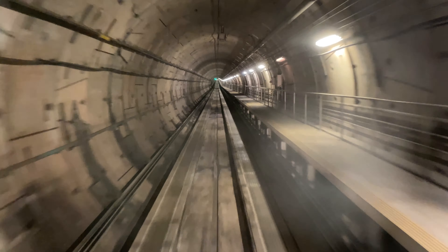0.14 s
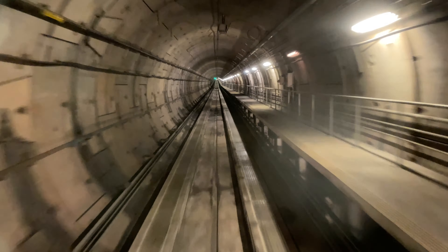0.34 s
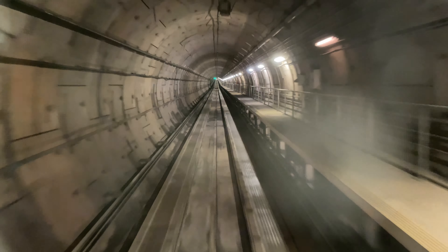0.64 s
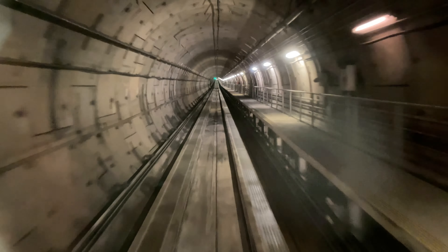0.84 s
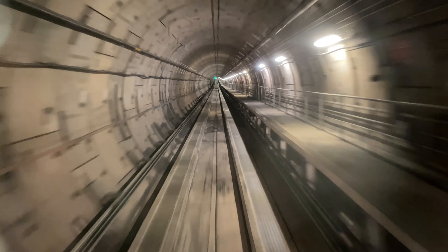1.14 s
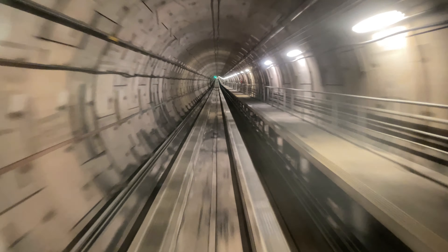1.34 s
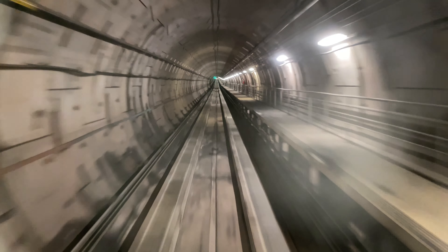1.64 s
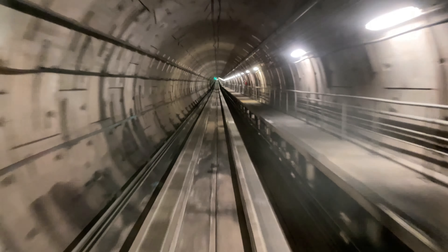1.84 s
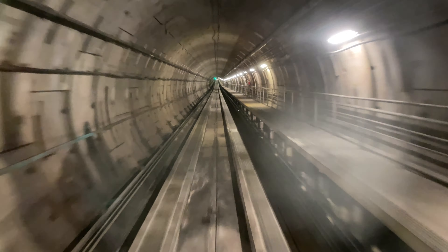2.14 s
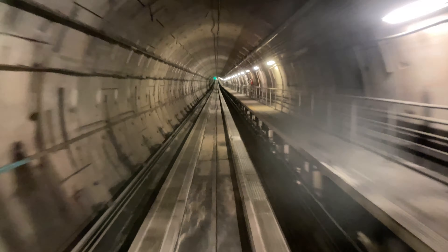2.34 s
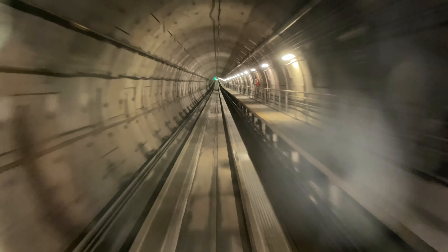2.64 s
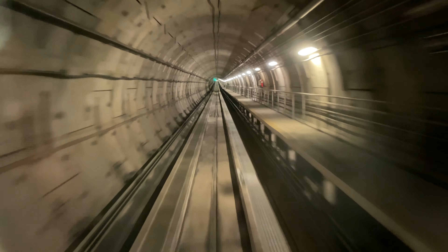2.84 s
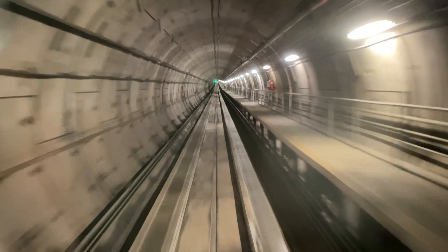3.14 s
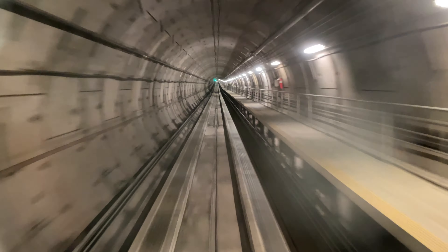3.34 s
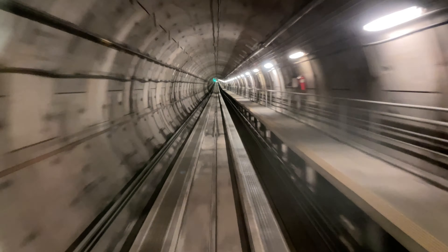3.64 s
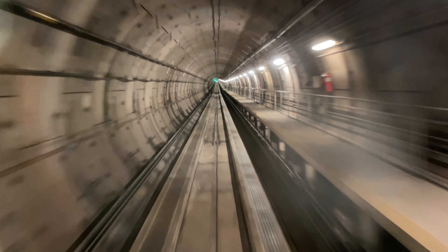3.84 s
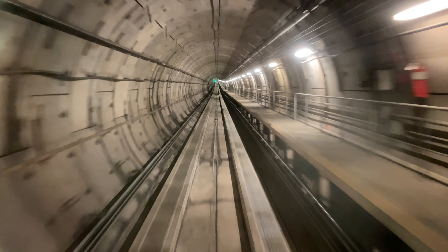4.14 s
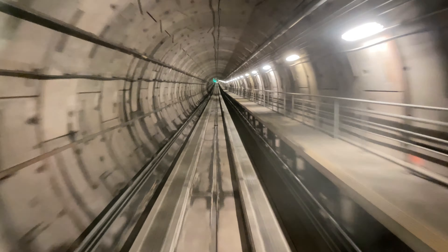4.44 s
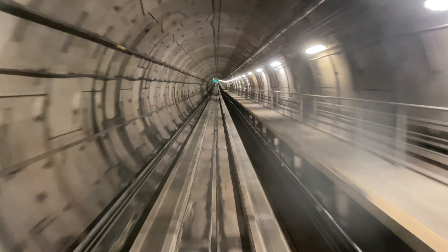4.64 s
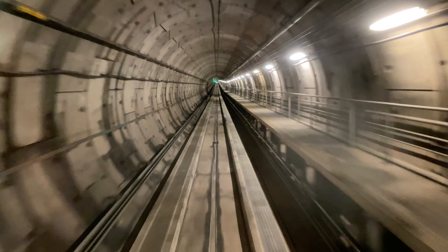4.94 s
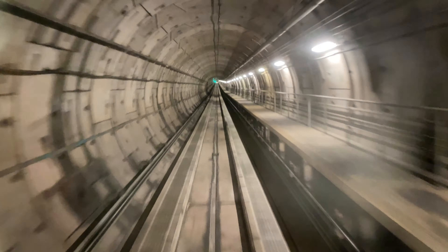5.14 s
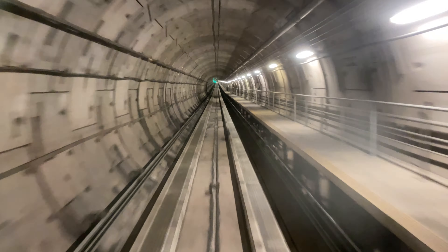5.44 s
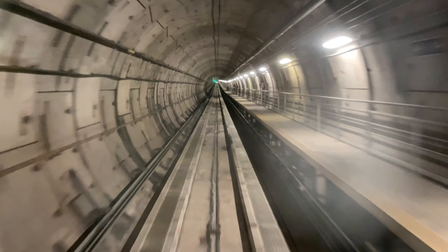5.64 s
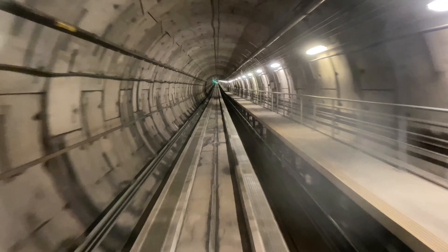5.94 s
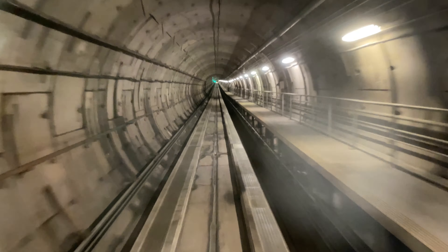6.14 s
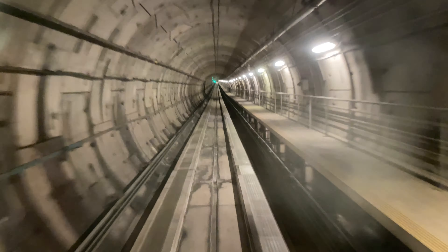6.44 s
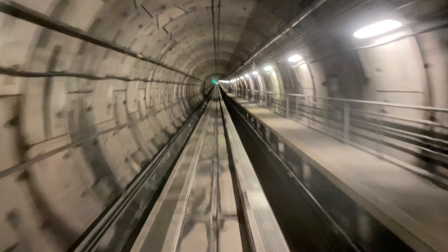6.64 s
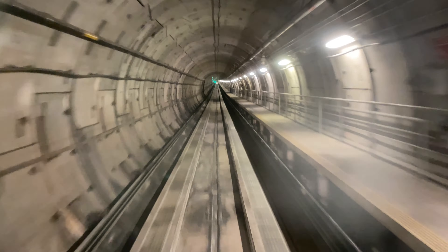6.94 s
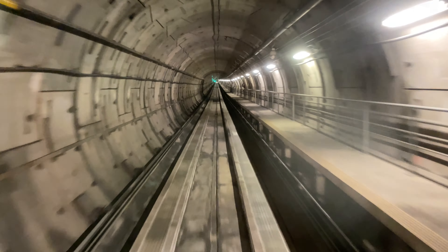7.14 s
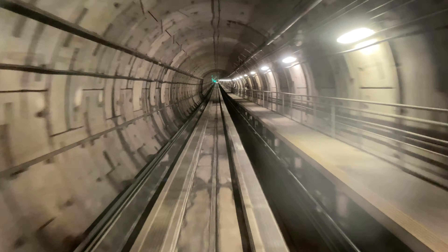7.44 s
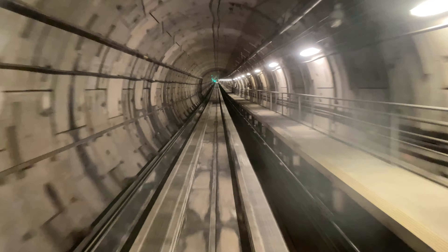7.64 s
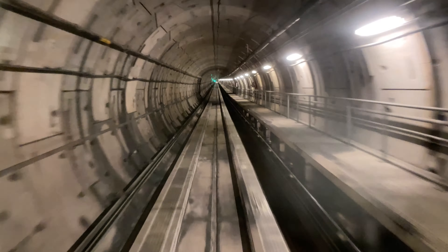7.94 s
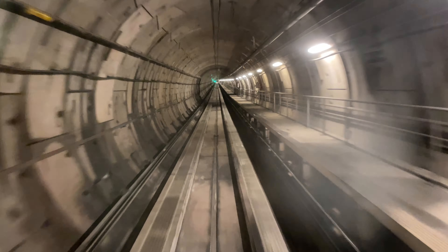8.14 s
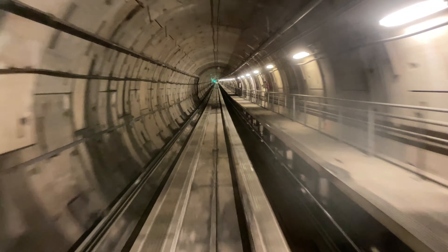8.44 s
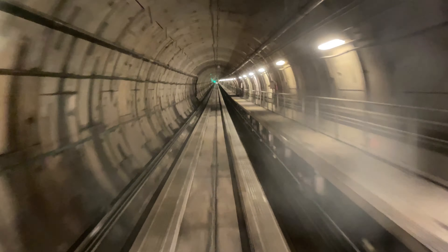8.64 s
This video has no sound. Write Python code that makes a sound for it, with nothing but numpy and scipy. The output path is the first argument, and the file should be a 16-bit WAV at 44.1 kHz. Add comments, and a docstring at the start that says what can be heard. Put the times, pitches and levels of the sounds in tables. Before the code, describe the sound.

A train on rubber tyres picks up speed in a tunnel, heard by a phone inside the car. Humming tyre tones climb gently and settle at cruising pitch, swelling and fading over a continuous heavy rumble and rolling hiss. A second, slightly lower set of tones and a faint electric whine die away by the middle. A fan hum and a low booming drone continue underneath as the ride grows slightly quieter.

```python
"""A deep rumble and a stack of slowly rising tyre tones: the front car of a rubber-tyred train gathering
speed in a concrete tunnel, heard by a phone. Tread blocks meeting the track sing the tones, with a roar
around them, and a slower set of tyres dies away. Underneath, a shaft booms and a fan hums; on top,
rolling noise hisses through the walls and the drive electronics whistle faintly."""
import sys
import numpy as np
from scipy import signal
from scipy.fft import rfft, irfft, next_fast_len
from scipy.io import wavfile
from scipy.ndimage import uniform_filter1d, minimum_filter1d

SR = 44100
rng = np.random.default_rng(int(sys.argv[2]) if len(sys.argv) > 2 else 0)


def store_wav(level_fs):
    """Save 16-bit WAV to argv[1]."""
    pcm = np.round(np.clip(np.atleast_2d(level_fs), -1, 1) * 32767)
    wavfile.write(sys.argv[1], SR, pcm.T.astype(np.int16))


N = 387638

# Colours of the cabin rumble, the rolling hiss and its treble: f/Hz, relative level/dB
RUMBLE_COLOUR = [(22, -37.5), (32, -12.5), (45, 1), (65, -2.5), (100, -4.5), (125, -10), (150, -12),
                 (230, -13), (380, -19.5), (700, -29), (1000, -78), (2000, -120)]
HISS_COLOUR = [(500, -24), (900, 0.5), (1200, -1.5), (1500, -8.5), (2050, -6.5), (2600, -16), (3300, -21.5),
               (4000, -25.5), (5200, -32), (5600, -34.5), (7200, -34.5), (9000, -39), (10500, -36.5),
               (13400, -45), (14400, -50.5)]
TREBLE_COLOUR = [(1800, -30.5), (2500, 0), (3500, -5), (5000, -14.5), (7000, -20), (8500, -49)]
# Fader rides of those three beds along the tunnel: t/s, level/dB
RUMBLE_RIDE = [(0, -24), (.7, -20), (1.3, -21), (1.9, -21), (2.3, -21.5), (2.9, -22), (3.8, -24.5),
               (4.6, -23.5), (5.3, -24.5), (5.9, -25.5), (6.5, -23.5), (7.2, -24), (7.8, -24.5), (8.3, -24),
               (8.79, -26.5)]
HISS_RIDE = [(0, -31.5), (.6, -32), (1.15, -32.5), (1.5, -32), (1.9, -33.5), (2.4, -33.5), (3.2, -34.5),
             (4.6, -35), (5.7, -36.5), (7, -36), (8.79, -37)]
TREBLE_RIDE = [(0, -59), (.5, -52), (1.0, -64.5), (1.35, -59), (1.5, -49.5), (1.75, -59), (2.3, -59),
               (3.0, -62), (3.3, -54), (4.0, -60), (4.45, -59), (5.0, -62), (8.79, -69)]
# Narrow whistling bands: f/Hz, width/Hz, level/dB, flicker/dB
WHISTLE_BANDS = [(3330, 200, -60, 1.5), (5150, 400, -72, 2.5), (11450, 450, -68, .5), (13360, 90, -82, 3),
                 (11435, 40, -72, .5), (11540, 60, -76, .5)]
# Fader rides of the drive whine, the fan and the shaft: t/s, level/dB
WHINE_RIDE = [(0, -76), (.7, -69), (1.05, -68), (1.22, -64), (1.5, -67), (2.1, -71), (2.6, -74), (3.2, -80),
              (8.79, -88)]
FAN_RIDE = [(0, -26.5), (.5, -26.5), (1.2, -30), (1.55, -25.5), (2.0, -30.5), (2.35, -35.5), (2.8, -30),
            (4.0, -34), (5.0, -34.5), (5.6, -34.5), (6.2, -44), (6.8, -37), (7.2, -44), (8.2, -41),
            (8.5, -30.5), (8.79, -38)]
SHAFT_RIDE = [(0, -37), (.6, -28), (1.4, -31), (1.75, -19.5), (2.0, -26), (2.7, -20.5), (3.3, -23),
              (3.45, -26), (3.7, -22.5), (4.15, -28.5), (4.32, -18), (4.5, -29), (4.7, -20.5), (4.9, -23.5),
              (5.15, -19.5), (5.55, -25.5), (5.95, -28.5), (6.2, -20.5), (6.7, -20.5), (7.1, -29.5),
              (8.0, -30), (8.4, -40.5), (8.65, -26.5)]
# Humps of the tyre roar: multiple of the tread rate, relative level/dB
ROAR_COLOUR = [(.8, -42), (.95, -16.5), (1.08, -18), (1.3, -31), (1.72, -19), (1.83, -6.5), (1.92, -4.5),
               (2.0, -1), (2.1, -3), (2.2, -4.5), (2.4, -10), (2.62, -14.5), (2.78, -7), (3.0, -2.5),
               (3.2, -5), (3.45, -15), (3.7, -15), (4.0, -7.5), (4.3, -16.5), (4.6, -26.5), (5.0, -15.5),
               (5.5, -26.5), (6.0, -24), (6.6, -31), (8, -41.5), (14, -120)]
# The slower tyres dying away: t/s, 1st partial level/dB, 2nd partial level/dB
SLOW_TYRE_RIDE = [(0, -40, -29), (.25, -26, -16.5), (.45, -32.5, -21.5), (.6, -36, -23.5),
                  (.72, -30, -21.5), (.92, -32, -18.5), (1.05, -36.5, -26), (1.3, -39, -33.5),
                  (1.8, -31, -28), (2.2, -27.5, -34), (2.6, -27, -23.5), (3.0, -28, -33), (3.7, -42, -40.5),
                  (4.4, -36.5, -34), (5.2, -58.5, -52.5)]
# Swells and fades of the three tread partials: t/s, level/dB
TREAD_RIDE_1 = [(0, -21.5), (.4, -31.5), (.75, -29.5), (1.3, -33), (2.3, -25.5), (2.9, -31), (4.0, -37),
                (4.55, -29), (5.1, -24.5), (5.4, -29), (5.55, -48), (5.9, -36), (6.4, -37), (6.8, -34),
                (7.1, -38), (7.55, -42.5), (7.75, -30), (7.85, -40.5), (8.0, -33.5), (8.25, -36.5),
                (8.4, -31.5), (8.79, -34)]
TREAD_RIDE_2 = [(.15, -37.5), (.4, -19), (.6, -42), (.95, -27.5), (1.2, -48), (1.4, -22), (1.6, -30.5),
                (1.8, -19.5), (2.0, -27), (2.17, -20), (2.27, -24), (2.36, -16), (2.55, -25.5),
                (2.75, -18.5), (2.92, -24), (3.02, -16), (3.3, -25), (3.45, -20), (3.65, -20.5),
                (3.75, -27.5), (3.84, -18.5), (4.0, -31), (4.2, -21), (4.5, -28), (4.75, -18), (5.0, -13.5),
                (5.12, -19.5), (5.22, -21.5), (5.4, -16), (5.65, -19), (5.9, -24), (6.1, -23.5),
                (6.25, -20.5), (6.55, -20), (6.85, -22), (7.05, -31), (7.25, -29.5), (7.35, -21),
                (7.7, -19), (7.9, -22.5), (8.02, -30), (8.1, -17.5), (8.35, -23), (8.52, -18),
                (8.62, -27.5), (8.79, -31)]
TREAD_RIDE_3 = [(0, -33.5), (.3, -31), (.9, -39), (1.05, -26.5), (1.15, -30.5), (1.27, -20), (1.4, -38.5),
                (1.58, -15.5), (1.68, -31.5), (1.76, -21.5), (1.88, -39), (2.0, -25.5), (2.6, -25.5),
                (2.85, -32.5), (3.5, -30), (3.8, -26.5), (4.0, -35), (4.25, -21), (4.6, -29.5), (5.1, -31),
                (5.6, -23.5), (6.1, -30), (6.8, -33.5), (7.2, -36.5), (7.7, -38.5), (8.0, -28.5),
                (8.2, -38.5), (8.5, -24), (8.79, -37)]
# The cabin at the two microphone ports: f/Hz, likeness 0-1, left lead/rad, left minus right/dB
STEREO_IMAGE = [(40, .999, 0, -0.5), (130, 0.97, 0, -0.5), (200, 0.87, 0, -3.5), (332, 0.86, 0.5, 0),
                (428, 0.2, 0.46, 0.5), (433, 0.8, .5, -0.5), (507, 0.32, 0.29, 2.5), (600, 1, 0, 6),
                (643, .65, 0, 0), (773, 0.2, 0.48, 1.5), (870, 0.57, 3, 1.5), (1230, 0.42, 3, 3.5),
                (1236, 0.56, 3.5, 2.5), (1590, 0.3, 4.5, 1.5), (2060, 0.6, 7, 1), (2520, 0.2, 7.5, 9.5),
                (3100, .7, 7, -0.5), (3600, 0.6, 7.5, 6), (4250, 0.3, 7, 0.5), (6360, 0.5, 8, 2),
                (7000, 0.7, 8, 1), (8340, 0.98, 9.5, 0), (9300, 0.99, 9.5, -1), (10450, .7, 9, -1),
                (11500, 0.99, 7, 1), (12500, 0.9, 7.5, -0.5)]

START_HZ, CRUISE_HZ = 217.6, 264.5  # tread rate: blocks meeting the track
SETTLE_S, SETTLE_SHAPE = 2.05, 1.15  # how the speed closes in on cruising
SHAFT_ORDER, WHINE_ORDER, UPPER_ROAR_ORDER = .1768, 21.2, 3.5  # multiples of the tread rate
FAN_HZ, FAN_DIP_DB = 176.5, 3
MIC_DB, CEILING, LIMIT_S, TOP_HZ = .8, .9, .006, 14300


def undb(db):
    """Decibels to gain."""
    return 10 ** (np.asarray(db) / 20)


def ride(table, column=1):
    """One column of a timed table at every sample."""
    return np.interp(np.arange(N) / SR, *np.transpose(table)[[0, column]])


def along(freq, table):
    """Columns of a spectrum table on a log-frequency axis."""
    f, *columns = np.transpose(table)
    return [np.interp(np.log(freq + 1e-9), np.log(f), c) for c in columns]


def noise(colour, size=N, rate=SR):
    """Two unrelated noises of one colour, rms 1."""
    size = next_fast_len(size)
    gain = undb(along(np.fft.rfftfreq(size, 1 / rate), colour)[0])
    x = irfft(rfft(rng.standard_normal((2, size))) * gain, size)
    return x / x.std()


def wander(hz):
    """Random values held 1 / hz s and slewed twice; spread 1."""
    hold = int(SR / hz)
    steps = np.repeat(rng.standard_normal(N // hold + 1), hold)
    drift = uniform_filter1d(uniform_filter1d(steps, hold), hold)[:N]
    return drift / drift.std()


def tone(cycles, db, flutter_db, waver_rad, smear_rad=0.):
    """A partial on a direct and a weaker roundabout path; reflections make level and phase wander."""
    phase = 2 * np.pi * cycles + waver_rad * wander(7) + smear_rad * wander(35)
    paths = np.sin([phase, phase + 1.5 + .9 * wander(3.3)]) * undb([[0], [-3]])
    return undb(db + flutter_db * wander(9)) * np.sqrt(2) * paths


def cabin_rumble():
    """The cabin's low, gently heaving bed."""
    return noise(RUMBLE_COLOUR)[:, :N] * undb(ride(RUMBLE_RIDE) + 1.2 * wander(2.5) + .64 * wander(8))


def rolling_hiss(hiss_db):
    """Rolling noise comes through the walls; its treble swells now and then."""
    body = noise(HISS_COLOUR)[:, :N] * undb(hiss_db + .77 * wander(4) + .57 * wander(30))
    treble = noise(TREBLE_COLOUR)[:, :N] * undb(ride(TREBLE_RIDE) + 1.5 * wander(12))
    return body + treble


def whistle(hiss_db):
    """Ringing panels and drive electronics: narrow noise bands that ride with the hiss."""
    out = 0
    for hz, width, db, flicker_db in WHISTLE_BANDS:
        band = [(hz / 2, -99), (hz - 4.7 * width, -40), (hz - width / 2, -3), (hz, 0),
                (hz + width / 2, -3), (hz + 2 * width, -40), (hz * 1.5, -99)]
        out = out + undb(db + flicker_db * wander(2.8)) * noise(band)[:, :N]
    return out * undb(hiss_db - hiss_db.mean() + .6 * wander(25))


def drive_whine(blocks):
    """The drive's faint, smeared high whine under pulling force."""
    return tone(WHINE_ORDER * blocks, ride(WHINE_RIDE), flutter_db=4, waver_rad=3, smear_rad=9)


def fan_hum():
    """A fan hums on a fixed pitch and drops out now and then; two more lines sit below it."""
    db = ride(FAN_RIDE) - FAN_DIP_DB * wander(4) ** 2
    turns = FAN_HZ / 3 * np.arange(N) / SR
    hum = tone(3 * turns, db, flutter_db=2.3, waver_rad=.3)
    return hum + tone(2 * turns, -39, 3.1, .24) + tone(turns, db - 3.5, 1.4, .31)


def shaft_boom(blocks):
    """A shaft booms at one cycle a turn, rising with the speed."""
    return tone(SHAFT_ORDER * blocks, ride(SHAFT_RIDE), flutter_db=.7, waver_rad=.12)


def tyre_roar(blocks, pull):
    """Uneven blocks spread each partial into a hump: noise along the track, read at travel speed."""
    per_block = 256  # noise samples
    size = next_fast_len(int(blocks[-1] + 2) * per_block)
    spectrum = rfft(noise(ROAR_COLOUR, size=size, rate=per_block))
    order = np.fft.rfftfreq(size, 1 / per_block) + 1e-9
    upper_share = 1 / (1 + (UPPER_ROAR_ORDER / order) ** 12)
    upper_db = -2.5 + 9.5 * pull  # the upper humps grow under pulling force
    roar = 0
    for share, db in (1 - upper_share, 0), (upper_share, upper_db):
        track = irfft(spectrum * share, size)
        rolled = np.array([np.interp(blocks * per_block, np.arange(size), path) for path in track])
        roar = roar + rolled * undb(db)
    fade_db = -19.5 - .27 * np.arange(N) / SR  # fainter deeper in the tunnel
    return roar * undb(fade_db + .68 * wander(3.42))


def slow_tyres(tread_hz, pull):
    """A slower set of tyres sings three partials just under the main ones and dies away."""
    blocks = np.cumsum(tread_hz * (.918 + .018 * pull)) / SR
    first_db, second_db = ride(SLOW_TYRE_RIDE), ride(SLOW_TYRE_RIDE, column=2)
    partials = (1, first_db, .1), (2, second_db, .4), (3, second_db - 6.5, 1.8)
    return sum(tone(k * blocks, db, flutter_db=1.3, waver_rad=.42, smear_rad=smear)
               for k, db, smear in partials)


def tread_song(blocks, pull):
    """The lead voice: tread blocks sing three partials; slip roughens the third under pulling force."""
    slip_rad = 4 * pull ** 1.5
    partials = (1, TREAD_RIDE_1, .1), (2, TREAD_RIDE_2, .22), (3, TREAD_RIDE_3, .4 + slip_rad)
    return sum(tone(k * blocks, ride(levels), flutter_db=.7, waver_rad=.25, smear_rad=smear)
               for k, levels, smear in partials)


def mic_ports(paths):
    """The first path reaches both ports alike, the second in opposition; likeness sets their shares."""
    edge = SR // 4
    paths = np.pad(paths, ((0, 0), (edge, edge)), mode="reflect", reflect_type="odd")
    size = next_fast_len(paths.shape[1])
    likeness, lead_rad, pan_db = along(np.fft.rfftfreq(size, 1 / SR), STEREO_IMAGE)
    likeness = np.clip(likeness, 0, .9995)
    mid, side = rfft(paths, size) * np.sqrt([(1 + likeness) / 2, (1 - likeness) / 2])
    pan = undb(pan_db / 2) * np.exp(.5j * lead_rad)
    return irfft([(mid + side) * pan, (mid - side) / pan], size)[:, edge:edge + N]


def scene():
    """Beds, tyres and machinery, heard through the cabin as the train gathers speed."""
    t = np.arange(N) / SR
    pull = np.exp(-(t / SETTLE_S) ** SETTLE_SHAPE)  # pulling force: share of the speed still to gain
    tread_hz = CRUISE_HZ - (CRUISE_HZ - START_HZ) * pull
    blocks = np.cumsum(tread_hz) / SR  # tread blocks rolled so far
    hiss_db = ride(HISS_RIDE)
    beds = cabin_rumble() + rolling_hiss(hiss_db)
    tyres = tread_song(blocks, pull) + slow_tyres(tread_hz, pull) + tyre_roar(blocks, pull)
    machinery = fan_hum() + shaft_boom(blocks) + drive_whine(blocks) + whistle(hiss_db)
    return mic_ports(beds + tyres + machinery)


def record(dry):
    """The phone's limiter eases the loudest peaks, and the top is cut."""
    x = dry * undb(MIC_DB)
    span = int(LIMIT_S * SR)
    safe_gain = np.minimum(CEILING / (np.abs(x).max(axis=0) + 1e-9), 1)
    limited = x * uniform_filter1d(minimum_filter1d(safe_gain, span), span)
    return signal.sosfilt(signal.ellip(8, .2, 70, TOP_HZ, fs=SR, output="sos"), limited)


dry = scene()
out = record(dry)
store_wav(out)
```